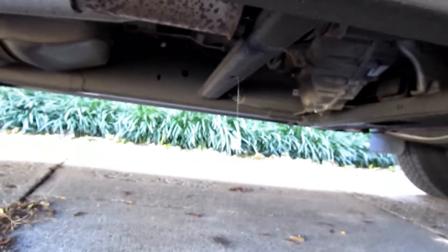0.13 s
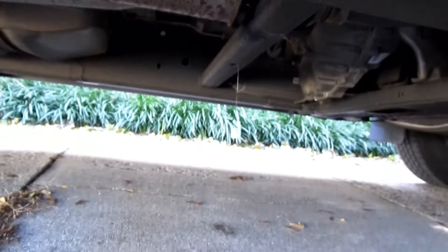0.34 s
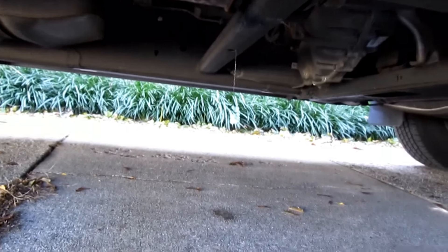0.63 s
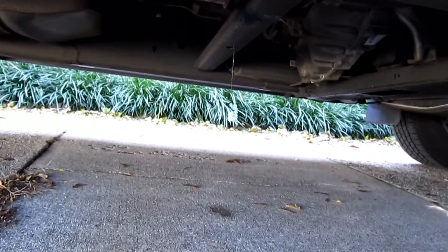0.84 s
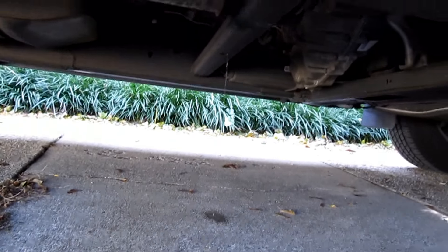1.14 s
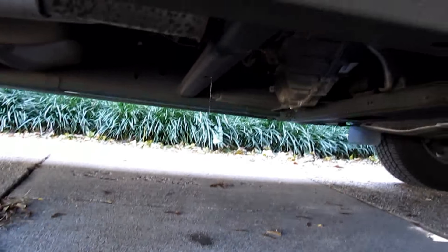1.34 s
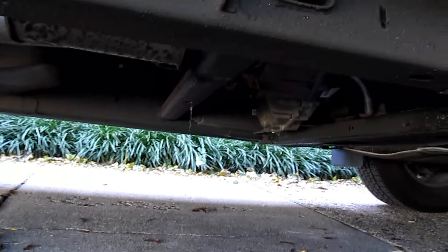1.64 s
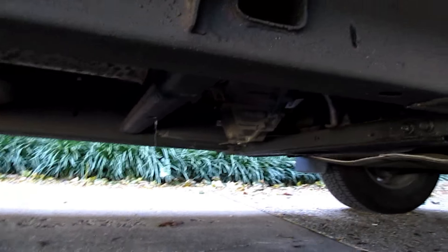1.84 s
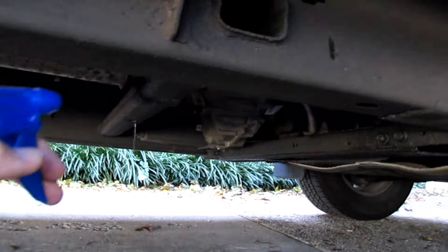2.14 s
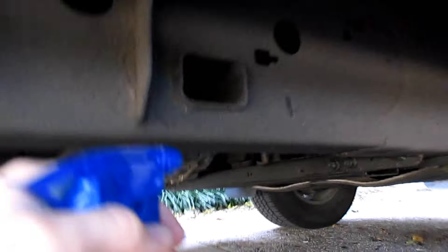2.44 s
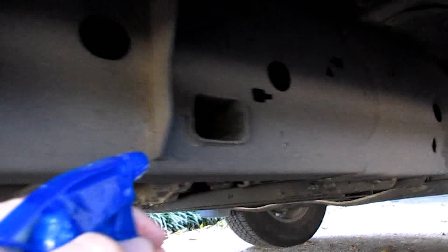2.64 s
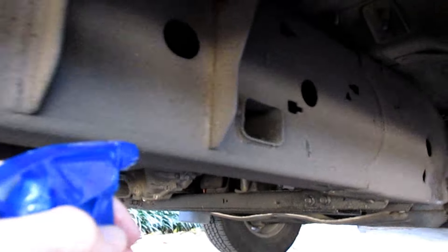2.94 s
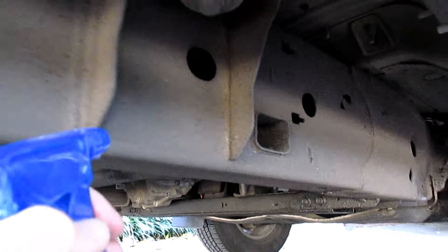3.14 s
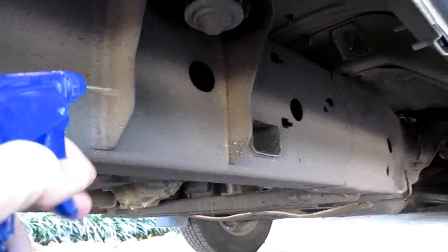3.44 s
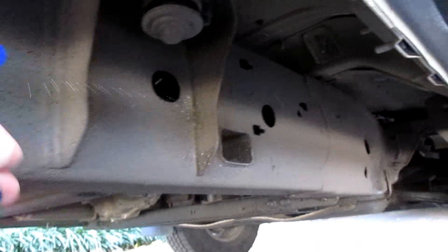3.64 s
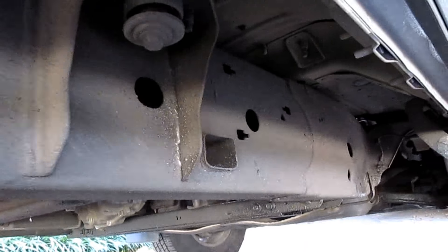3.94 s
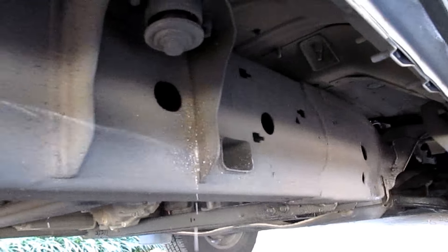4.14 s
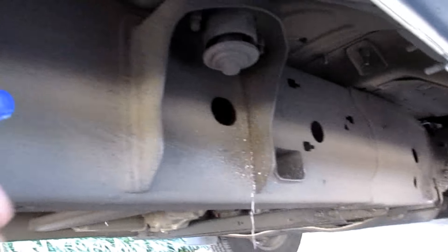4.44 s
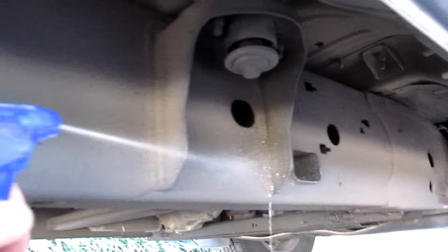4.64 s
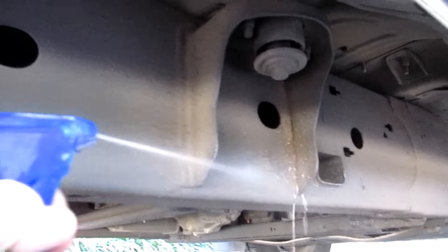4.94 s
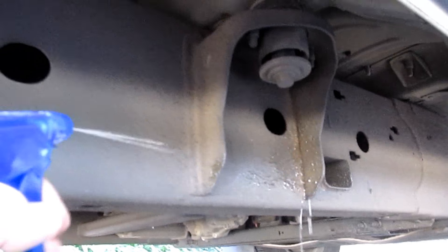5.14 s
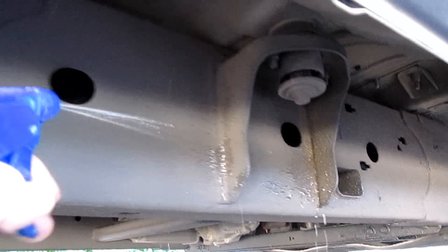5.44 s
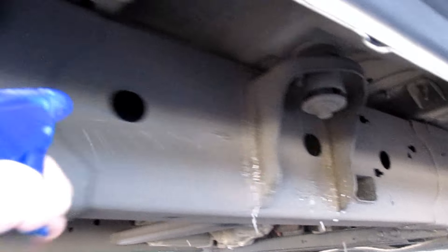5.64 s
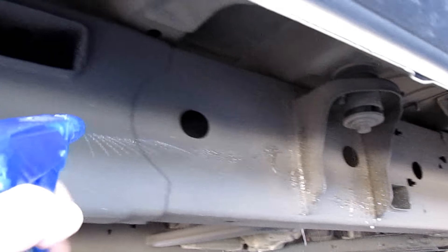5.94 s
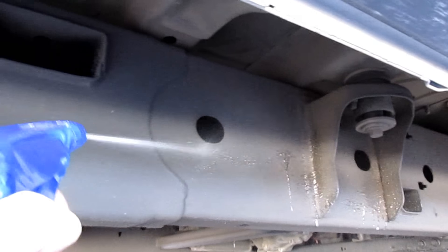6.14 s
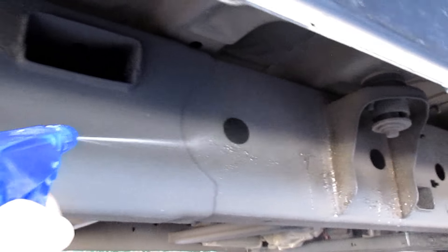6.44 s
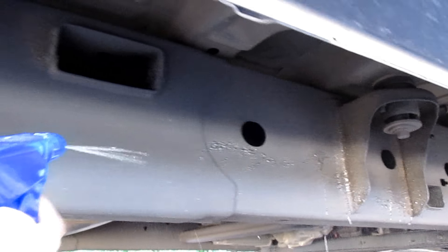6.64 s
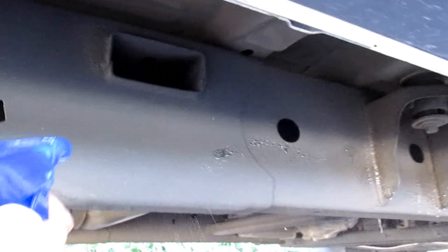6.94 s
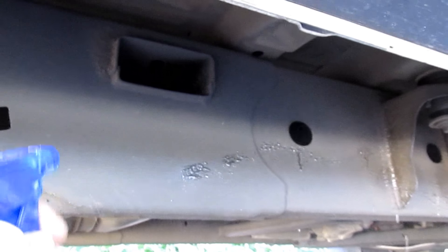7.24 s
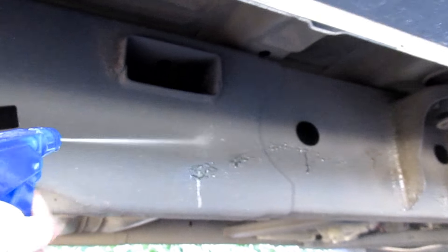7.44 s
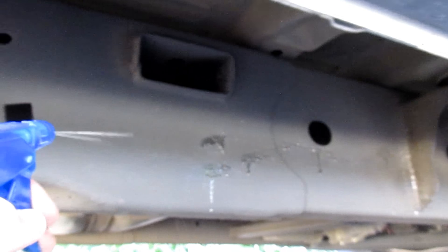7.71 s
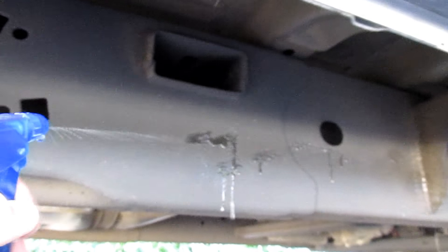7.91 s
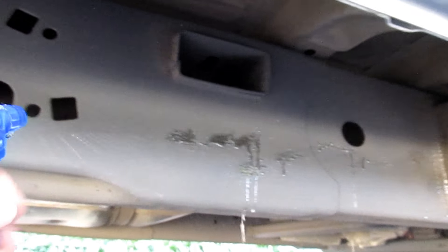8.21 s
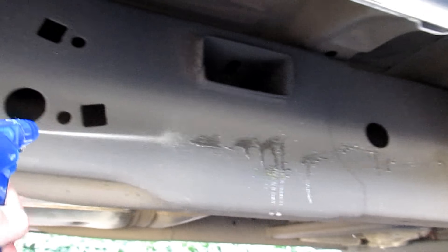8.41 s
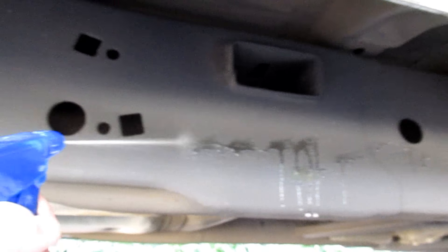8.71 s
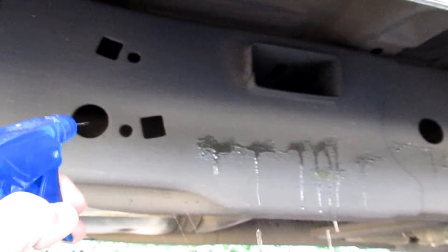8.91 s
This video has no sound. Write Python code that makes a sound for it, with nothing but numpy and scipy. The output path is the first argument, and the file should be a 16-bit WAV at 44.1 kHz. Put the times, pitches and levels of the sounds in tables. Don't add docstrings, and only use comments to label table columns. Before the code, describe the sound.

A close, rough hand-held perspective near the ground. Quiet engine drone and street rumble come first, then loud bumps, gritty scraping and sleeve rustle on the microphone body. From about three seconds a plastic sprayer squirts in steady rapid rhythm, each crisp hiss splashing on metal and followed by a click and buzzy piston return. More handling knocks intrude midway; later squirts ring the hollow rail faintly.

```python
import sys
import numpy as np
from scipy import signal
from scipy.fft import rfft, irfft
from scipy.io import wavfile
from scipy.ndimage import uniform_filter1d

SR = 44100
rng = np.random.default_rng(int(sys.argv[2]) if len(sys.argv) > 2 else 0)


def field_ratio(decibels):
    return 10 ** (np.asarray(decibels, dtype=float) / 20)


def unload_wav(signal):
    wavfile.write(
        sys.argv[1],
        SR,
        np.round(np.clip(np.atleast_2d(signal).T, -1, 1) * 32767).astype(np.int16),
    )


N = 399987
t = np.arange(N) / SR

# (time [s], pitch [Hz], level [dB])
HUM = [(0.0, 94.6, -40), (0.28, 95.9, -34.5), (2.02, 96.6, -25.5), (2.8, 98.9, -42), (3.21, 95.8, -39.5),
       (4.24, 94.6, -32), (4.75, 97.2, -35.5), (6.74, 93.8, -38), (6.95, 97.7, -40.5), (7.2, 94.7, -37.5),
       (8.89, 95.3, -35), (9.07, 86, -32)]
# (time [s], level [dB])
WHINE = [
    (0, -48.5),
    (2.3, -44),
    (3.5, -52),
    (4.3, -38.5),
    (4.75, -51.5),
    (9.07, -53),
]
# (frequency [Hz], density [dB per Hz])
STREET = [(22, -23), (50, -4.5), (130, -2.5), (285, -20.5), (1440, -30.5), (4140, -50), (7500, -50),
          (11000, -56.5)]
# (time [s], bass level [dB])
GUSTS = [
    (0, 9.5),
    (1, 3.5),
    (1.5, -13),
    (2, 3),
    (3.5, -3),
    (4.7, 2.5),
    (5.5, -9),
    (7, -13),
    (9.07, 5),
]
# (frequency [Hz], level [dB])
PORT_DIFFERENCE = [(30, -16), (250, -21.5), (600, -12.5), (1400, -6), (3000, 0), (8000, -0.5)]
WHINE_HZ, STREET_DB = 212.8, -37.5
GUST_HZ, PORT_HISS_DB = 56.4, -58

# (time [s], length [s], first rumble [dB], last rumble [dB], grit above rumble [dB])
DRAGS = [(1.445, 0.068, -30, -42, -12), (1.495, 0.081, -34.5, -39, 4.5), (1.61, 0.21, -25, -51, -8),
         (1.794, 0.041, -17, -21, -16.5), (1.83, 0.57, -28, -62, -18.5), (2.334, 0.062, -12, -19, -16),
         (2.39, 0.091, -17.5, -11.5, -17), (2.48, 0.043, -15.5, -13.5, -17.5),
         (2.52, 0.11, -15, -12, -15.5), (2.63, 0.11, -13, -13.5, -16.5), (2.71, 0.11, -18, -21.5, -11),
         (2.8, 0.073, -19, -25, -11), (2.86, .14, -20, -26.5, -18.5), (3.008, 0.08, -20.5, -16.5, -18.5),
         (3.08, 0.073, -19.5, -15.5, -18), (3.155, 0.08, -20.5, -19.5, -20), (3.24, 0.083, -15, -28, -17),
         (3.335, 0.053, -20, -45, -19), (3.38, 0.099, -45.5, -33.5, 5), (4.632, 0.19, -38.5, -66, 6),
         (5.3, 0.33, -36, -32, -10), (5.585, 0.05, -15.5, -28, -17.5), (5.64, 0.093, -24, -19.5, -15.5),
         (5.74, 0.147, -26.5, -29, -10.5), (5.905, 0.1, -31, -33.5, -3), (6.01, 0.18, -35, -42.5, 3),
         (6.2, 0.16, -39, -35, -1.5), (6.41, 0.062, -28.5, -39, -10), (6.48, 0.069, -35, -37, -5),
         (6.56, 0.082, -34, -30.5, -9), (6.63, 0.066, -31, -40, 2), (6.7, 0.061, -26.5, -31, -13),
         (6.768, 0.12, -24.5, -41, -4.5), (6.876, 0.056, -18.5, -19, -5), (6.92, 0.086, -33, -48, -3)]
# (time [s], length [s], first level [dB], last level [dB])
RUBS = [(1.44, 0.093, -46.5, -39.5), (1.535, 0.065, -39.5, -49), (1.605, 0.22, -42, -56),
        (1.795, .06, -41, -58), (1.85, 0.34, -42.5, -72), (2.15, 0.09, -54, -48.5),
        (2.243, 0.044, -41.5, -41), (2.29, .045, -42.5, -35), (2.39, 0.072, -43, -51),
        (2.447, 0.055, -40, -57), (2.332, 0.11, -31, -66), (2.541, 0.028, -29, -43),
        (2.568, 0.044, -37, -48), (2.632, 0.086, -35, -54), (2.711, 0.069, -29, -39),
        (2.772, 0.097, -27.5, -37.5), (2.86, 0.15, -34, -50.5), (3.01, 0.053, -41.5, -27),
        (3.05, 0.22, -32, -65)]
# (time [s], peak [dB], pitch [Hz], length [s])
SQUEAKS = [(1.858, -43, 3530, 0.047), (2.114, -52, 2210, 0.15), (2.212, -57, 5230, .03),
           (2.24, -56, 5480, 0.017), (2.264, -40, 7040, 0.019), (2.264, -43, 5400, .02),
           (2.301, -51, 6930, 0.022), (2.303, -50, 5400, 0.035), (2.322, -38, 5500, .03),
           (2.325, -46, 8000, 0.023), (2.415, -37, 4640, .022), (2.448, -39, 4770, 0.03),
           (2.485, -48, 7450, 0.059), (2.503, -43, 4700, 0.04), (2.567, -33.5, 5770, 0.019),
           (2.697, -35, 4640, 0.02)]
# (time [s], peak [dB], ring [Hz], brightness [dB])
KNOCKS = [(1.448, -31, 214, -20), (1.53, -21.5, 266, -10), (1.616, -20.5, 177, -4.5),
          (1.734, -19.5, 183, -23), (1.791, 0, 305, -46), (1.938, -12.5, 220, -25), (2.344, -7, 297, -19),
          (2.399, -11, 240, -36), (2.42, -6.5, 240, -28), (2.464, -24, 200, -23), (2.591, -8, 237, -21),
          (2.604, -13, 200, -32), (2.7, -5.5, 264, -32), (2.815, -6, 278, -33), (2.835, -1.5, 296, -35),
          (2.92, -8, 300, -23), (3.104, -19, 220, -23), (3.263, -4.5, 179, -38), (5.362, -19, 281, -18),
          (5.501, -21, 230, -35), (6.581, -21, 225.3, -27), (6.603, -16.5, 233, -27), (1.811, -8, 271, -42),
          (3.03, -6, 306, -49), (3.32, -3, 223, -31), (3.536, -26, 296, -35), (5.426, -21, 337, -46),
          (5.597, -6, 190, -37), (5.692, -7.5, 221.5, -23), (5.92, -20, 289, -27), (6.42, -19, 203, -23),
          (6.712, -22, 170.3, -27), (6.778, -7, 310, -45), (6.882, -5, 335, -12)]
# (time [s], peak [dB], ring
# [Hz], fade [s])
CLACKS = [(1.616, -19.5, 1060, 0.028), (1.632, -12, 1150, 0.0057), (1.797, -27, 1710, 0.021),
          (2.353, -20, 1500, 0.008), (2.427, -11, 650, 0.002), (2.45, -23, 1960, 0.013),
          (2.488, -12, 620, 0.003), (2.547, -8, 650, 0.0015), (2.611, -13, 600, 0.003),
          (2.656, -12, 695, 0.002), (2.644, -16, 1100, .002), (3.269, -18, 970, 0.019),
          (3.324, -14.5, 260, 0.017), (3.272, -33, 1700, .006), (2.464, -17, 606, 0.0063),
          (2.626, -28, 780, 0.01), (2.69, -17.5, 650, 0.024), (2.721, -21, 600, .012),
          (1.635, -26, 2700, 0.011), (1.673, -34, 1350, 0.0074), (1.551, -26.5, 1050, .015),
          (1.814, -32, 3150, 0.0053), (3.272, -10.5, 559, 0.01), (6.879, -6.5, 190, 0.0014),
          (4.664, -22.5, 1100, 0.014), (5.607, -31, 300, 0.0072), (5.634, -20.5, 920, 0.01),
          (5.657, -9, 886, 0.0077), (5.76, -24, 905, 0.016), (6.075, -17, 910, 0.012),
          (6.78, -44, 782, 0.059), (6.888, -20.5, 1800, 0.015), (6.88, -19, 426, 0.0036),
          (6.893, -17, 610, 0.0081), (6.9175, -6, 175, .0015), (7.245, -34, 1752, 0.02),
          (8.98, -28, 308, 0.018),
          (1.055, -48, 2600, .0006), (1.662, -28.5, 3180, .0054), (1.943, -38, 3550, 0.0073),
           (2.634, -31, 2870, 0.023), (2.714, -19.5, 7050, 0.019), (2.782, -26, 6540, 0.031),
           (3.269, -16, 3280, 0.015), (4.137, -36, 2640, 0.0057), (4.39, -3, 12500, 0.0023),
           (5.611, -12.5, 3100, 0.00099), (5.657, -14, 3370, 0.00072), (6.272, -14.5, 12200, 0.0057),
           (6.442, -10, 12050, 0.0045)]
# (frequency [Hz], density [dB per Hz])
BODY = [(40, -13.5), (60, -3), (110, -6), (170, 2), (290, 2), (400, -8.5), (550, -10.5), (900, -66)]
GRIT = [(300, -12.5), (450, 3.5), (600, 7), (800, 4), (950, -0.5), (1150, 0), (1600, -13), (2600, -19.5),
        (4000, -33)]
CLOTH = [(1500, 1.5), (3000, -2), (4200, -4.5), (7000, -2), (9500, -8.5), (15500, -13)]
CATCH_S, CATCH_DB = 0.022, -2.5
BLOW = 9.5

# (time [s], peak [dB])
TICKS = [(1.055, -28), (2.5448, -16), (2.717, -9.5), (2.782, -14), (3.268, -13), (3.2707, -3),
         (3.6252, -33), (3.8723, -18), (4.0087, -25), (3.88, -14), (3.895, -11), (3.942, -3), (3.947, -13),
         (3.958, -9), (4.368, -8), (4.3868, -23), (4.6738, -28), (5.028, -13), (5.3785, -19), (5.6118, -4),
         (5.855, -19), (6.644, -6), (6.7922, -16.5), (6.9565, -16), (7.467, -32), (7.486, -14.5),
         (6.463, -11.5), (6.668, -19), (7.117, -29), (7.79, -39), (7.818, -21), (8.418, -38), (.06, -51),
         (0.478, -51), (.56, -44), (0.632, -49), (7.245, -14), (5.542, -21), (4.138, -10), (4.169, -11),
         (3.666, -14), (7.8048, -22), (8.012, -16), (8.331, -15), (8.436, -17), (8.6387, -11), (8.746, -16),
         (8.765, -9), (9.022, -16.5)]
# (frequency [Hz], density [dB per Hz])
SNAP = [(500, 3.5), (1500, -5.5), (2500, 2), (4000, -5.5), (6000, 7.5), (9000, 9), (13000, 4.5),
        (16000, -0.5)]

# (time [s], valve tick [dB], rise [s], peak [dB], slip rate [Hz])
RELEASES = [(3.452, -30, 0.036, -29, 334.6), (3.728, -15.5, 0.033, -29, 343),
            (3.9857, -17, 0.034, -28, 380), (4.2262, -14, 0.027, -29, 355.3),
            (4.522, -12.5, 0.032, -28, 397), (4.8301, -15.5, 0.046, -33, 409.4),
            (5.1146, -13.5, 0.035, -26.5, 373), (5.4059, -11, 0.042, -23, 417),
            (5.7188, -12.5, 0.039, -29.5, 404.7), (6.0262, -14, 0.045, -25.5, 426.5),
            (6.328, -11.5, 0.044, -27, 410), (6.6155, -15, 0.045, -28, 360.4),
            (6.934, -13.5, 0.024, -27.5, 362.5), (7.2971, -13, 0.034, -25, 351.4),
            (7.6701, -8.5, 0.037, -28, 361), (7.9931, -17, .023, -26.5, 336.4),
            (8.296, -13, 0.036, -28.5, 324.7), (8.605, -16, 0.034, -32, 310.7),
            (8.898, -15, 0.045, -32.5, 346)]
GRIP_DB = [-1, -5, -2.5, -0.5, -4, -5.5, -1.5, -8, -1.5, -2, -2.5, 0, -12, -11, -4, 0, -9, -11, 3.5]
# (frequency [Hz], density [dB per Hz])
PISTON = [(1200, -13), (3000, -11.5), (4100, -12), (6200, -7), (8500, 3.5), (10500, -1.5), (14000, -0.5),
          (16500, -9)]
SEAL = [(700, -22), (1900, -9), (4100, -7), (6190, 0.5), (8660, 1), (10500, -1), (15800, 3.5), (16500, -23)]
SLOW_START, SUCK_DB, SUCK_TAIL_S = 0.75, -17, 0.067
VALVE_LEAD_S, HOLD_S, SUCK_S = 0.0013, 0.0082, 0.017
CUT_S, CUT_DB = 0.01, -8
CHATTER_START_DB, START_PER_TICK = -18, 0.9

# (time [s], trigger tick [dB], wait for the jet [s], jet length [s], first hiss [dB])
SQUEEZES = [(3.243, -39, 0.086, 0.096, -28.5), (3.5565, -9, 0.073, 0.021, -22.5),
            (3.8216, -6.5, 0.061, 0.042, -22.5), (4.0806, -4.5, 0.05, 0.045, -26.5),
            (4.3322, -16.5, 0.077, 0.058, -36.5), (4.636, -14, 0.033, 0.1, -33.5),
            (4.926, -38, 0.045, 0.1, -33), (5.217, -7.5, 0.062, 0.069, -29.5),
            (5.523, -34, 0.076, 0.073, -29), (5.828, -40, 0.075, 0.073, -30.5),
            (6.132, -14.5, 0.074, 0.076, -29.5), (6.429, -3, 0.069, 0.064, -32.5),
            (6.742, -35, 0.072, 0.053, -32.5), (7.095, -42, 0.065, 0.088, -36),
            (7.448, -37, 0.091, 0.074, -36), (7.78, -63, 0.078, 0.089, -31), (8.101, -6, 0.066, 0.074, -31),
            (8.4068, -61, 0.072, 0.071, -31.5), (8.719, -37, 0.069, 0.052, -28.5),
            (9.0029, -45, 0.065, .05, -27)]
DRYNESS_DB = np.array([7, 0, -3.5, 1, -3.5, -11, .1, -4.5, -0.5, 2.5, -3.5, 0, -0.5, 0.5, -3, -1, -5.5, 0, 1, 2])
# (wait [s], level [dB])
SPITS = [(0.026, -34), (0.021, -34), (0.022, -34), (0.013, -32), (0.044, -32), (0.032, -37), (0.024, -34),
         (0.016, -26.5), (0.0276, -27), (0.024, -28), (0.017, -28), (0.019, -26), (0.019, -29),
         (0.013, -38), (0.024, -25.5), (0.031, -27), (0.022, -23), (0.037, -31), (0.04, -26), (0.03, -21.5)]
# (frequency [Hz], density [dB per Hz])
JET = [(2350, -29), (4000, -11), (5610, 1.5), (8850, 0.5), (10400, -1.5), (14400, 4), (16000, -3.5),
       (16500, -36)]
SPLASH = [(300, -26), (700, 1), (1500, -0.5), (2400, -2), (3400, 3.5), (4300, -3.5), (6000, -9)]
# (time [s], splash [dB])
SQUARENESS = [(3.25, 2.3), (3.56, 5), (3.82, 5.5), (4.1, 0.5), (4.4, 2.3), (4.9, 0.5), (5.3, -2.5),
              (5.8, 2), (6.4, 0.5), (7.1, -1.5), (7.8, -0.8), (8.4, 1), (9.0, 0)]
# (frequency [Hz], width [Hz], level [dB])
RAIL_MODES = [(662, 35, 0), (1240, 40, -9), (1690, 50, -8), (1950, 70, -8)]
# (time [s], level [dB])
RAIL_RING = [
    (3.2, -62),
    (5, -31),
    (6.5, -20),
    (7.2, -12),
    (9.07, -16.5),
]
# (time [s], treble [dB])
FACING = [(3.3, -1.5), (3.6, -0.5), (3.9, 1.5), (4.15, -0.5), (4.45, 1), (4.75, 2.5), (5.05, -1.5),
          (5.35, 1.7), (5.7, -5.5), (6.05, -4), (6.5, -2), (6.9, -2.8), (7.3, -1), (7.7, -3), (8.1, -4),
          (8.5, -0.5), (9.0, -6.5)]
CREAK_DB, CREAK_PER_TICK = -37.5, 0.12
STEADY_DB, SETTLES, SAG_DB_PER_S = -24.5, 0.33, 74
SPLASH_DB, SPLASH_PER_HISS = -36.5, 0.29
DRUM_HZ, DRUM_DB, DRUM_PER_RING = 2000, 3.0, 0.25
SPIT_S, SPIT_DB, SPIT_HZ = np.array([-.009, 0, .013]), np.array([-9, 0, -14]), 11900
SHADE_HZ = 7900


def evened(x):
    return x / np.sqrt(np.mean(x ** 2) + 1e-20)


def read(points, hz):
    f, value = np.transpose(points)
    return np.interp(np.log(hz + 1), np.log(f + 1), value)


def follow(points):
    return np.interp(t, *np.transpose(points))


def envelope(corners):
    out = np.zeros(N)
    for s, db in corners:
        inside = slice(round(s[0] * SR), round(s[-1] * SR))
        out[inside] = np.maximum(out[inside], field_ratio(np.interp(t[inside], s, db)))
    return uniform_filter1d(out, size=60)


def strokes(rows, above=0):
    return envelope(([s, s + CATCH_S, s + length], np.array([first + CATCH_DB, first, last]) + above * sum(more))
                    for s, length, first, last, *more in rows)


def colour(x, points):
    level_db = np.maximum(read(points, abs(np.fft.fftfreq(4096, 1 / SR))), -90)
    log_gain = np.log(field_ratio(level_db))
    taps = np.fft.ifft(np.exp(np.conj(signal.hilbert(log_gain)))).real[:1024]
    filtered = signal.oaconvolve(np.atleast_2d(x), taps[None], axes=1)
    return filtered[:, :np.shape(x)[-1]] / np.linalg.norm(taps)


def low_pass(x, hz):
    return signal.lfilter(*signal.butter(2, hz, fs=SR), x)


def resonate(x, hz, width):
    r = np.exp(-np.pi * width / SR)
    return evened(signal.lfilter([1, 0, -1], [1, -2 * r * np.cos(2 * np.pi * hz / SR), r * r], x))


def wide(own):
    return evened(rng.standard_normal(N) + own * rng.standard_normal((2, N)))


def grains(per_s, spread_db, wash):
    size = field_ratio(spread_db * np.minimum(rng.exponential(1, N), 4)) * rng.choice([-1., 1.], N)
    clicks = evened(size * (rng.random(N) < per_s / SR))
    return evened(clicks + wash)


def flicker(samples, db):
    return field_ratio(db * evened(uniform_filter1d(rng.standard_normal(N), int(samples))))


def patchy(x, db, bins, frames):
    z = signal.stft(x, nperseg=256)[2]
    patches = uniform_filter1d(rng.standard_normal(z.shape[-2:]), int(bins), axis=0)
    patches = uniform_filter1d(patches, int(frames), axis=1)
    return evened(signal.istft(z * field_ratio(db * evened(patches)), nperseg=256)[1][..., :N])


def slips(hz, jitter, decay, leak, snap):
    wander = evened(uniform_filter1d(rng.standard_normal(N), size=150))
    turns = np.cumsum(hz * (1 + jitter * wander)) / SR
    size = field_ratio(1.3 * rng.standard_normal(8000))[np.clip(turns.astype(int), 0, 7999)]
    bursts = (size * np.exp(-(turns % 1) / decay) + leak) * np.sign(wide(own=1.0))
    snaps = size * (np.diff(np.floor(turns), prepend=0) > 0)
    return evened(bursts + snap * snaps)


def engine_tone(rows):
    s, hz, db = np.transpose(rows)
    phase = 2 * np.pi * np.cumsum(np.interp(t, s, hz)) / SR
    return np.sqrt(2) * field_ratio(np.interp(t, s, db)) * flicker(4000, db=2.2) * np.sin(phase)


def street():
    shape = field_ratio(read(STREET, np.fft.rfftfreq(N, 1 / SR)))
    air = evened(irfft(shape * rfft(rng.standard_normal(N)), N))
    gusts = low_pass(air, GUST_HZ) * (field_ratio(follow(GUSTS)) - 1)
    port_hiss = field_ratio(PORT_HISS_DB) * np.diff(rng.standard_normal(N + 2), 2)
    whine = [(s, WHINE_HZ, db) for s, db in WHINE]
    return (air + gusts + port_hiss) * field_ratio(STREET_DB) + engine_tone(HUM) + engine_tone(whine)


def drag(lumps):
    rumble = colour(grains(200, spread_db=1.0, wash=1.6 * rng.standard_normal(N)), BODY)
    rumble *= uniform_filter1d(strokes(DRAGS), size=250)
    grit = colour(grains(400, spread_db=2.0, wash=1.43 * rng.standard_normal(N)), GRIT)
    grit = patchy(grit, db=3.0, bins=2.5, frames=6.5) * strokes(DRAGS, above=0.82)
    cloth = colour(grains(300, spread_db=2.5, wash=1.5 * rng.standard_normal(N)), CLOTH)
    cloth = patchy(cloth, db=3.0, bins=6.5, frames=5.5) * strokes(RUBS)
    return ((rumble + field_ratio(-1.5) * grit + field_ratio(-1.5) * cloth) * lumps)[0]


def squeaks():
    out = np.zeros(N)
    for (s, db, hz, length), noise in zip(SQUEAKS, rng.standard_normal((len(SQUEAKS), 7000))):
        size = round(length * SR)
        squeak = resonate(noise ** 3, hz, 60)[-size:] * np.sqrt(np.hanning(size))
        out[round(s * SR):][:size] += field_ratio(db - 4) * squeak
    return out


def knocks():
    out, u = np.zeros(N + 4000), np.arange(3000) / SR
    cracks = colour(rng.standard_normal((len(KNOCKS), 3000)) * np.exp(-u / .008), GRIT)
    for (s, db, hz, bright_db), crack in zip(KNOCKS, cracks):
        ring = np.sin(2 * np.pi * hz * u) * (1 - np.exp(-u / 0.0011)) * np.exp(-u / 0.0091)
        out[round(s * SR):][:3000] += field_ratio(db) * (ring + field_ratio(bright_db - 6.5) * evened(crack))
    return out[:N]


def clacks():
    out, u = np.zeros(N + 4000), np.arange(3000) / SR
    for s, db, hz, fade in CLACKS:
        scatter = rng.standard_normal(3000) * np.exp(-u / fade)
        blow = BLOW * np.pi * hz / SR * np.sin(np.pi * np.minimum(2 * hz * u, 1))
        clack = resonate(scatter + blow, hz, 50 + 0.093 * hz + 0.13 / fade)
        clack = low_pass(clack, min(2 * hz, .4 * SR))
        out[round(s * SR):][:3000] += field_ratio(db) * clack / abs(clack).max()
    return out[:N]


def ticks():
    out, u, rows = np.zeros((2, N + 2000)), np.arange(1500) / SR, SQUEEZES + RELEASES + TICKS
    noise = rng.standard_normal((len(rows), 3, 1500))
    ports = noise[:, :1] + 0.63 * noise[:, 1:]
    shaped = ports * (np.exp(-u / 0.00032) + 0.26 * np.exp(-u / 0.0062))
    snaps = colour(shaped.reshape(-1, 1500), SNAP).reshape(shaped.shape)
    for (s, db, *_), snap in zip(rows, snaps):
        out[:, round(s * SR):][:, :1500] += snap / abs(snap).max() * field_ratio(db)
    return out[:, :N]


def chatter():
    s, _, rise, peak, rate = np.transpose(RELEASES)
    hz = np.interp(t, np.ravel([s, s + rise], "F"), np.ravel([SLOW_START * rate, rate], "F"))
    suck = envelope(zip(np.transpose([s + rise, s + rise + 0.018, s + rise + SUCK_TAIL_S]),
                        peak[:, None] + SUCK_DB + np.array([-3.0, 0, -16])))
    level = envelope((s + np.cumsum([VALVE_LEAD_S, rise, HOLD_S, CUT_S, SUCK_S]),
                      [CHATTER_START_DB + START_PER_TICK * tick_db + grip_db, peak, peak, peak + CUT_DB, peak - 34])
                     for (s, tick_db, rise, peak, _), grip_db in zip(RELEASES, GRIP_DB))
    piston = colour(slips(hz, jitter=.015, decay=.05, leak=.075, snap=4), PISTON)
    return piston * level + colour(wide(own=1.5), SEAL) * suck


def creak():
    s, tick_db, wait, _, _ = np.transpose(SQUEEZES)
    db = CREAK_DB + CREAK_PER_TICK * tick_db + DRYNESS_DB
    slack = envelope(zip(np.transpose([s, s + wait]), np.transpose([db + 4.0, db + 1.5])))
    seal = colour(slips(205, jitter=.15, decay=.07, leak=.1, snap=2.5), SEAL)
    return slack * seal * flicker(500, db=2.0)


def spray():
    s, _, wait, length, first = np.transpose(SQUEEZES)
    last = first + SETTLES * (STEADY_DB - SAG_DB_PER_S * length - first)
    times = np.transpose([s + wait - .014, s + wait, s + wait + length, s + wait + length + 0.072])
    levels = np.transpose([first - 9, first, last, last - 25])
    jet = envelope(zip(times, levels))
    splash_db = SPLASH_DB - STEADY_DB + (SPLASH_PER_HISS - 1) * (first - STEADY_DB)
    splash_db += np.interp(s, *np.transpose(SQUARENESS))
    wet = envelope(zip(times, levels + splash_db[:, None]))

    hiss = colour(grains(550, spread_db=5.0, wash=1.5 * wide(own=2.5)), JET)
    hiss = patchy(hiss, db=1.5, bins=12.5, frames=12.5) * flicker(130, db=2.0)
    spit = envelope((start + delay + SPIT_S, SPIT_DB + db) for start, (delay, db) in zip(s, SPITS))
    air = evened(signal.sosfilt(signal.butter(4, SPIT_HZ, "high", fs=SR, output="sos"), hiss))

    ring_db = follow(RAIL_RING)
    splash = colour(grains(1300, spread_db=1.5, wash=2.2 * wide(own=0.066)), SPLASH)
    drum = signal.filtfilt(*signal.butter(2, DRUM_HZ, fs=SR), splash)
    splash += drum * (field_ratio(DRUM_DB + DRUM_PER_RING * ring_db) - 1)
    drops = rng.standard_normal(N)
    rail = sum(field_ratio(db) * resonate(drops, hz, width) for hz, width, db in RAIL_MODES)
    rail *= uniform_filter1d(jet, size=900) * field_ratio(ring_db)
    return spit * air + jet * hiss + wet * splash + rail


def pair(a):
    hz, _, z = signal.stft(a, SR, nperseg=512)
    scattered = z * np.exp(2j * np.pi * rng.random(z.shape)) * field_ratio(read(PORT_DIFFERENCE, hz))[:, None]
    side = np.sqrt(2) * signal.istft(scattered, nperseg=512)[1][:N]
    return np.array([a + side, a - side])


def underside(x, wet_db=-0.5, lag=3.04):
    hop, u = 2000, np.arange(900) / SR
    out = np.zeros((2, N + 3 * hop))
    window = np.sin(np.pi * np.arange(2 * hop) / (2 * hop))
    for at in range(round(SQUEEZES[0][0] * SR) % hop, N - hop, hop):
        taps = rng.standard_normal((2, 900)) * (rng.random((2, 900)) < .08)
        taps *= np.exp(-u / .003) * (u > .0002)
        taps /= np.linalg.norm(taps, axis=1, keepdims=True)
        part = x[:, at:at + 2 * hop]
        wet = signal.oaconvolve(part * window[:part.shape[1]], taps, axes=1)
        out[:, at:at + wet.shape[1]] += field_ratio(wet_db) * wet
    late = np.sinc(np.arange(33) - 16 - np.array([[0], [lag]])) * np.hanning(33)
    direct = signal.oaconvolve(x, late, "same", axes=1)
    return (out[:, :N] + direct) / np.sqrt(1 + field_ratio(2 * wet_db))


def scene():
    around = street() + drag(flicker(600, db=1.75)) + squeaks() + knocks() + clacks()
    snaps = ticks() * field_ratio([[4.5], [2.2]])
    sprayer = (chatter() + creak() + spray()) * field_ratio([[3.0], [0.7]])
    shaded = low_pass(sprayer, SHADE_HZ)
    sprayer = shaded + (sprayer - shaded) * field_ratio(follow(FACING))
    return underside(sprayer + .5 * snaps) + 0.31 * snaps + pair(around) * field_ratio([[.3], [-.3]])


def top_cut(x):
    return signal.sosfilt(signal.butter(12, 16970, fs=SR, output="sos"), x)


def record(dry):
    overloaded = np.tanh(dry / 1.3) * 1.3
    limited = signal.oaconvolve(overloaded, signal.firwin(301, 15900, fs=SR)[None], "same")
    return top_cut(limited)


dry = scene()
out = record(dry)
unload_wav(out)
```